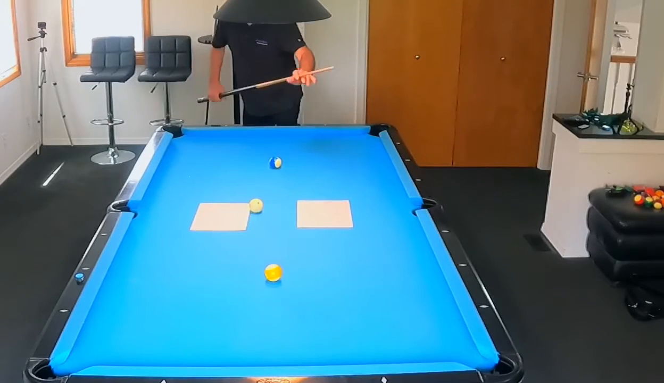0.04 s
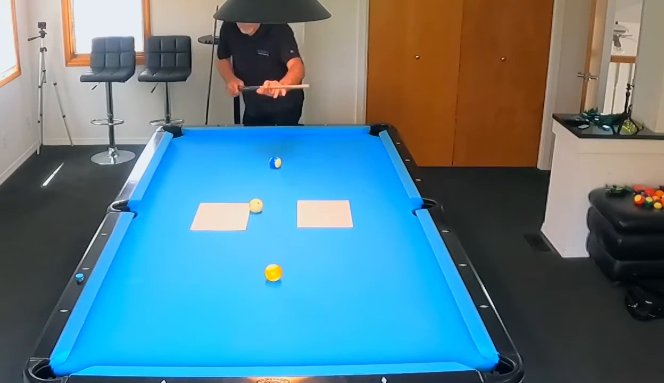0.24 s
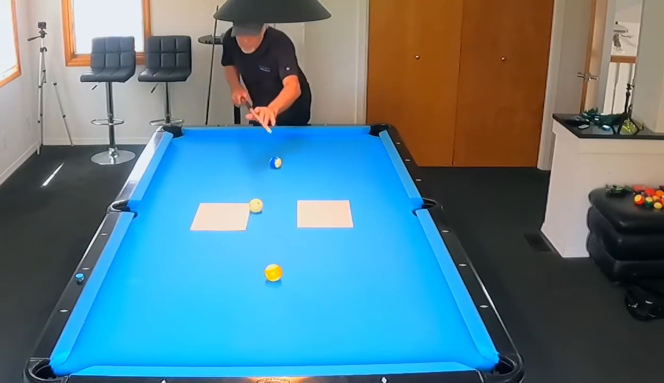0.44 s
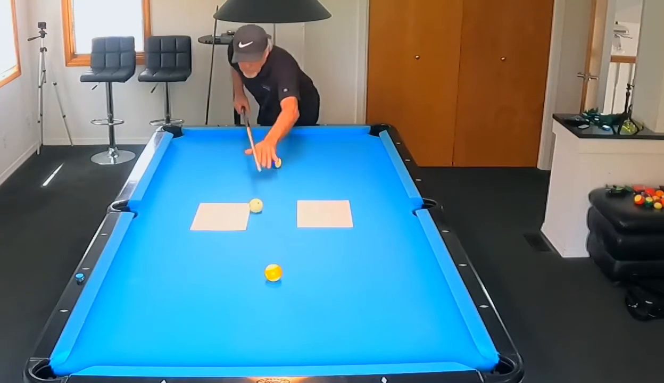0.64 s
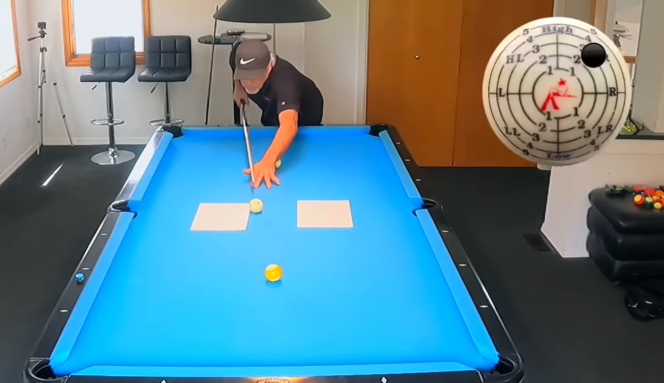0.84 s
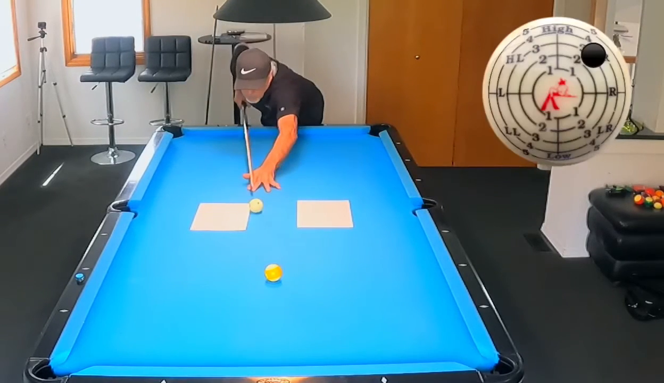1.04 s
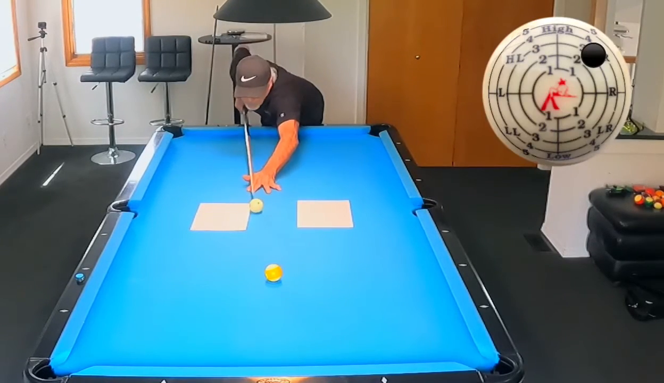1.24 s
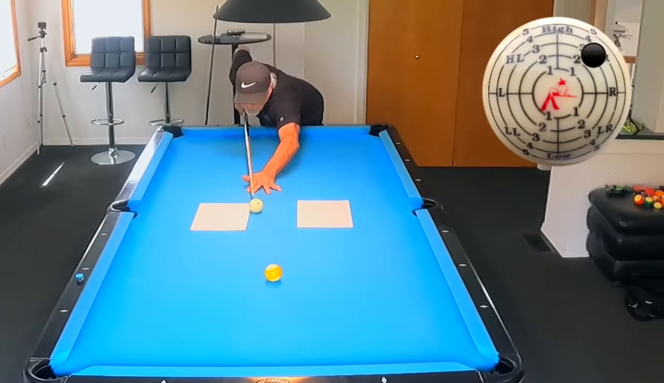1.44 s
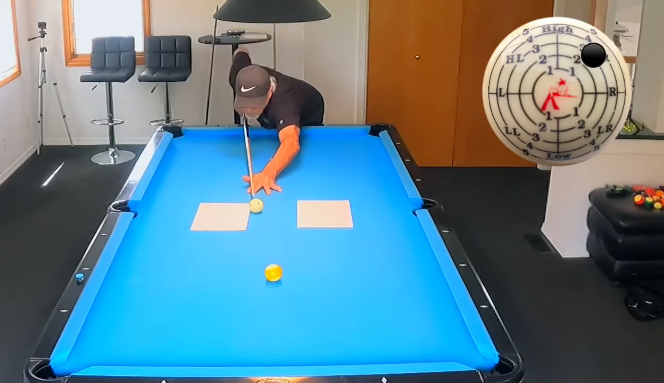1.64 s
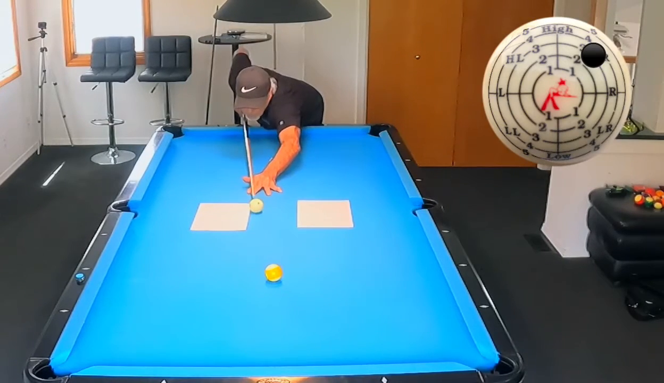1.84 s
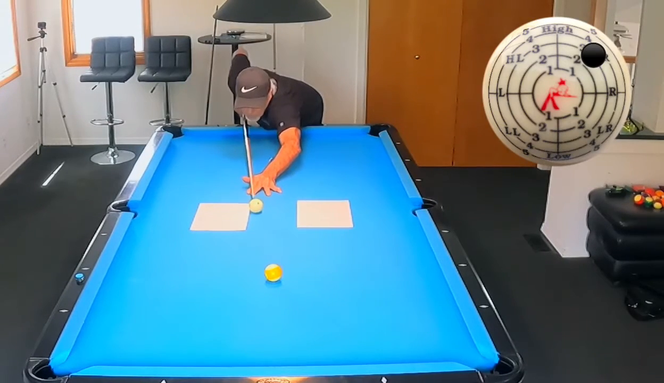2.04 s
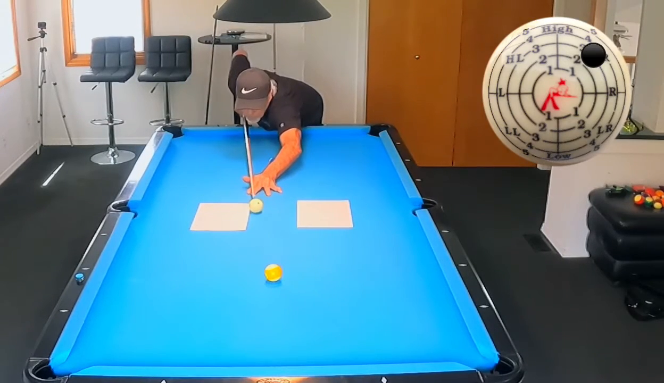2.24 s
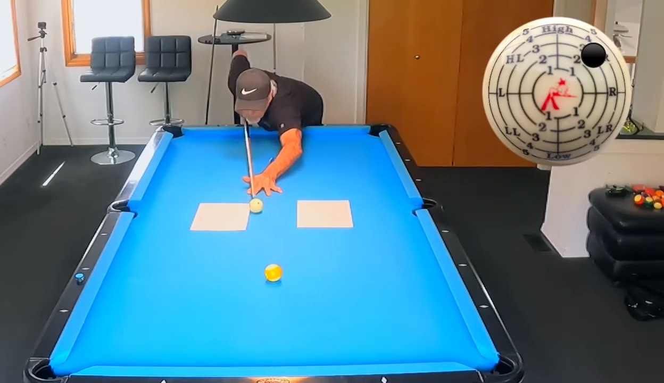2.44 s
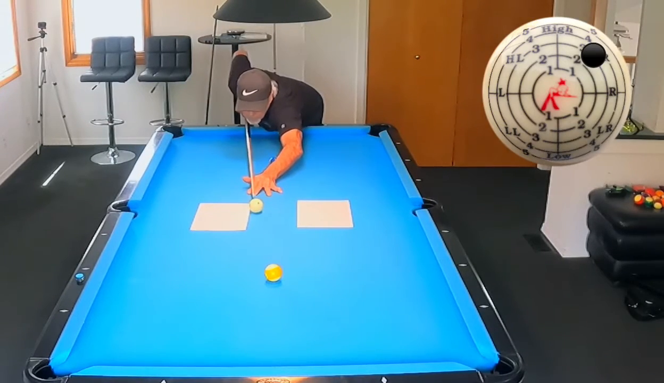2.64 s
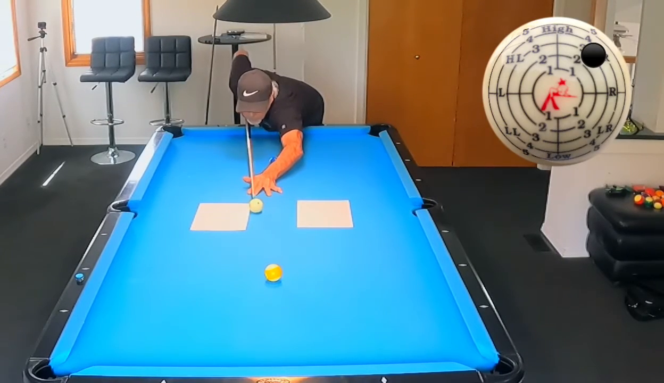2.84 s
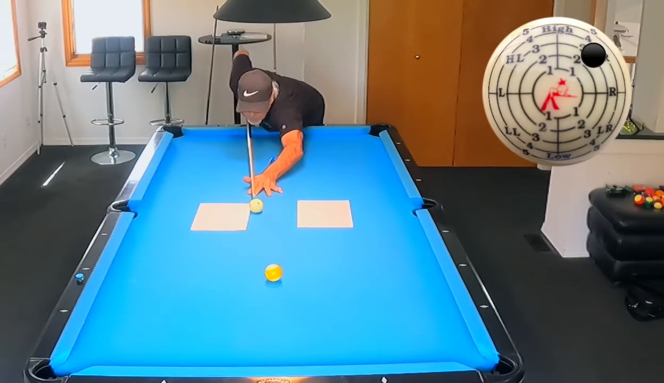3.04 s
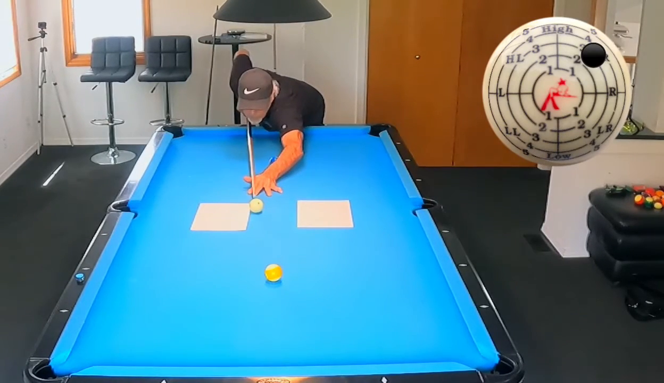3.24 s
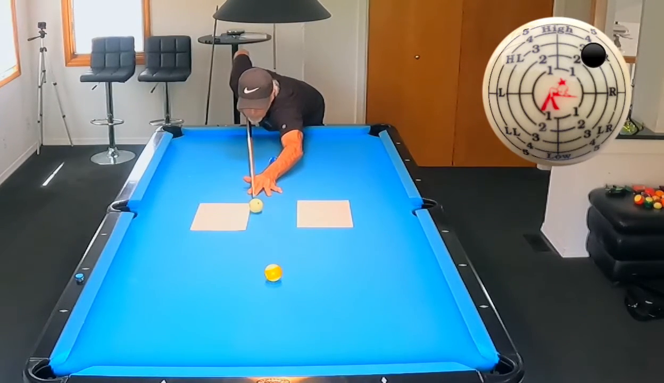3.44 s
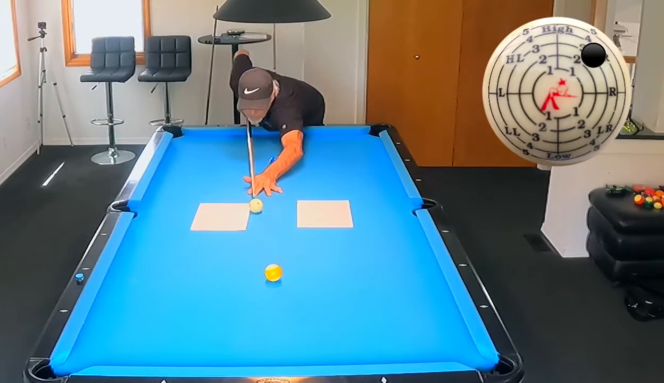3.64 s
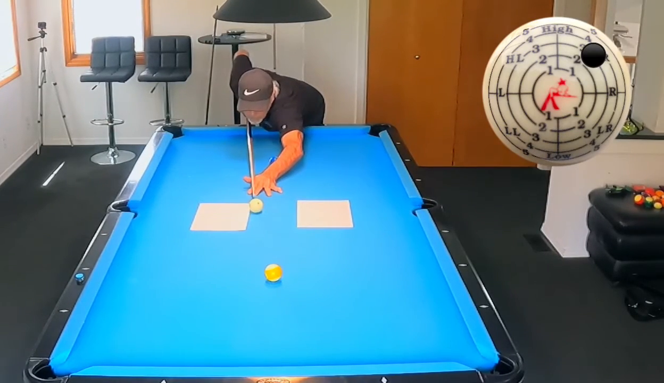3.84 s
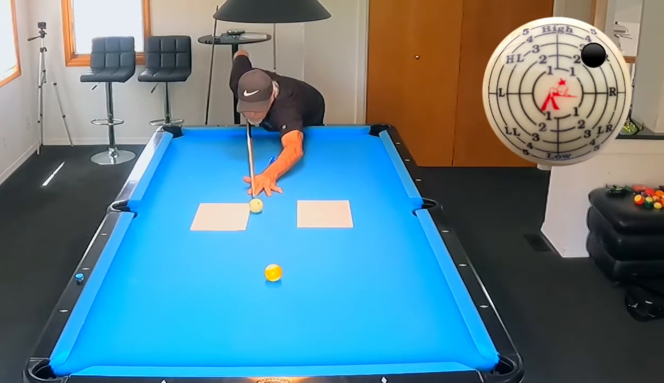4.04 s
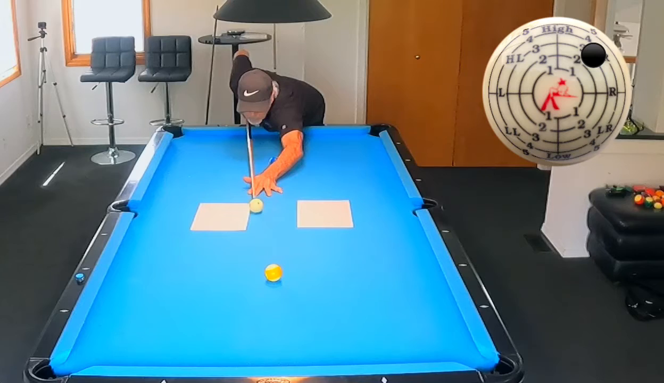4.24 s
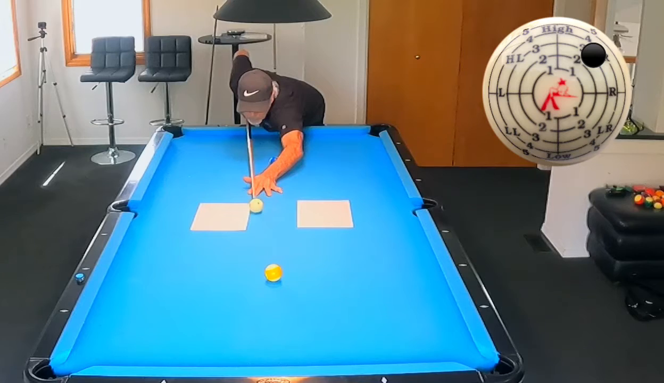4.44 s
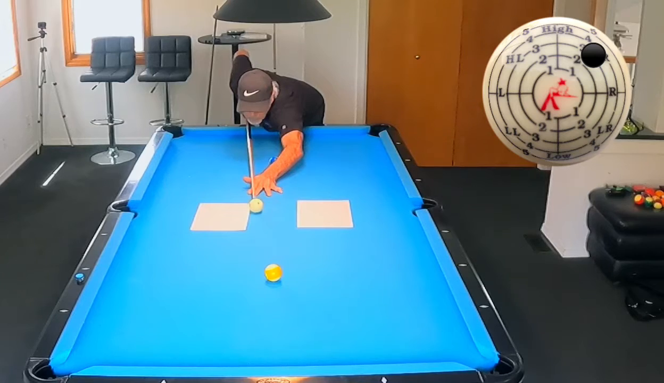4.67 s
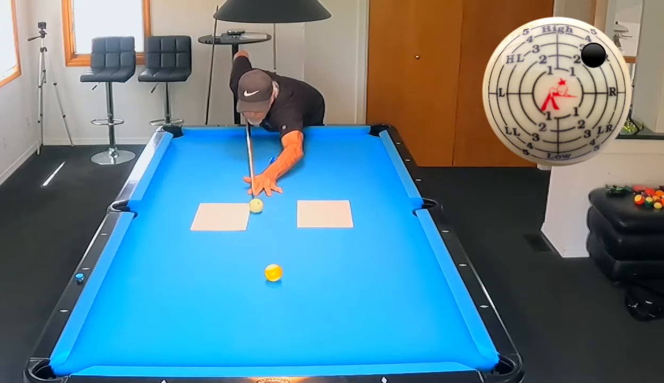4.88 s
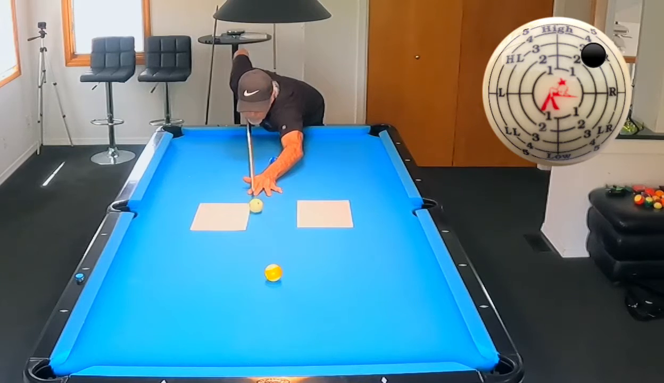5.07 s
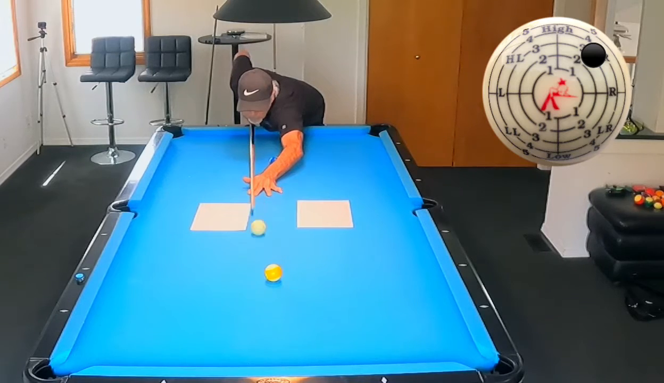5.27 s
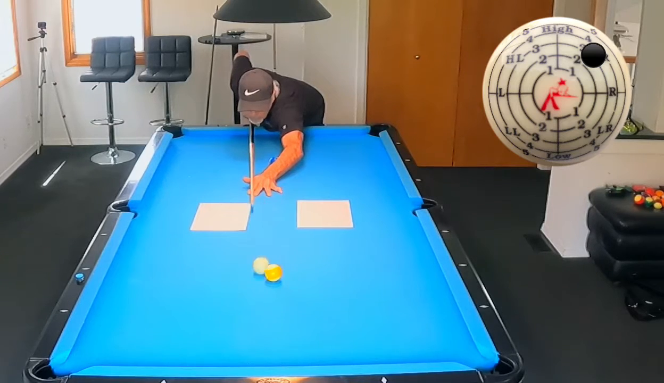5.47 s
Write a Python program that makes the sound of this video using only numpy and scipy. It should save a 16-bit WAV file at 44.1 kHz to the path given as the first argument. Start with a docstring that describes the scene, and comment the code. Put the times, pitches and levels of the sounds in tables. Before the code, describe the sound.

A steady low ventilation rumble with a wavering motor hum and barely audible thin whine runs throughout a quiet, moderately live games room, heard in stereo from the foot of a pool table. From 0 to 1 s, a player settles: soft muffled weight shifts, brushing cloth and, near 0.4 s, a very low footstep thud. A longer fabric sweep swells around 1 s, and a light rub comes at 1.5 s. At 2.0 s a hard, hollow wooden knock slaps out with a dull rebound and short room echo; the rustling then stops. From 2.5 to 5 s only faint shaft-on-hand rubs and small shifts appear, notably at 3.5, 3.8 and 4.5 s. At 5.23 s the tip strikes the ball: a loud dry tock with woody ringing and reverb. At 5.27 s the table bed booms deeply, and the ball rumbles and skids softly to the end.

```python
"""In a quiet, humming games room clothes rustle as a pool player settles, and the cue slides over the bridge hand.
A hard knock rings out; later the tip strikes the ball with a loud tock, the table booms and the ball skids on.
Blows are damped sine modes with short noise bursts and a noise reverb that dies band by band.
Cloth, hand, ball and ventilation are coloured stereo noise under gain curves; the hum is wavering sines."""
import sys
import numpy as np
from scipy import signal
from scipy.fft import rfft, irfft, next_fast_len
from scipy.io import wavfile
from scipy.ndimage import map_coordinates

SR = 44100
rng = np.random.default_rng(int(sys.argv[2]) if len(sys.argv) > 2 else 0)


def to_wav(sig):
    """Store sig (one row per channel, or 1-D mono) as 16-bit WAV at the path in sys.argv[1].

    Samples outside -1..1 are clipped; the rate is SR.
    """
    pcm = np.clip(np.atleast_2d(sig), -1, 1) * 32767
    pcm = np.round(pcm).astype(np.int16)
    wavfile.write(sys.argv[1], SR, pcm.T)  # frames by channels


N = 242991
T = np.arange(N) / SR  # s

# rubbed cloth, relative spectrum: (frequency [Hz], density [dB per Hz])
FABRIC_SPECTRUM = [(300, -1), (700, -6.5), (1200, 2.5), (1700, -2.5), (2600, -6.5), (4000, -7.5),
                   (5600, -5.5), (7500, -10.5), (9500, -18.5), (13000, -26)]


def amp(db):
    """Decibels to gain."""
    return 10 ** (np.asarray(db) / 20)


def unit(x):
    """Scale to rms 1."""
    return x / np.sqrt(np.mean(x ** 2) + 1e-20)


def along(points, hz):
    """Interpolate (Hz, value) points on a log frequency axis."""
    point_hz, value = np.transpose(points)
    return np.interp(np.log(hz + 1), np.log(point_hz), value)


def filtered(x, response):
    """Multiply the spectrum of x by a response of frequency [Hz]."""
    size = next_fast_len(x.shape[-1] + 8192)
    spectrum = rfft(x, size) * response(np.fft.rfftfreq(size, 1 / SR))
    return irfft(spectrum, size)[..., :x.shape[-1]]


def wobble(knots_per_s):
    """Smooth random curve through normally distributed knots."""
    knots = rng.standard_normal(int(N * knots_per_s / SR) + 4)
    return map_coordinates(knots, [T * knots_per_s])


def placed(x, start_s, left_db):
    """Start a stereo sound at start_s, the left channel raised by left_db relative to the right."""
    late = np.pad(x, ((0, 0), (round(start_s * SR), N)))[:, :N]
    return late * amp([[left_db / 2], [-left_db / 2]])


def at_mics(x):
    """Sound reaches the two microphones slightly out of phase."""
    # phase by which left leads right: (frequency [Hz], lead [rad])
    lead_points = [(100, -0.0092), (300, -0.48), (700, -0.9), (1500, -0.74), (3000, -0.83), (6000, 0)]
    side_sign = np.array([[1], [-1]])
    return filtered(x, lambda hz: np.exp(.5j * along(lead_points, hz) * side_sign))


def diffuse(spectrum, size=N):
    """Coloured stereo noise of rms 1: alike in both ears in the bass, less so in the treble."""
    # correlation between the microphones: (frequency [Hz], likeness [0..1])
    likeness = [(60, 0.98), (130, 0.94), (280, 0.84), (600, 0.76), (1400, 0.57), (3000, 0.63), (8000, 0.48)]

    def mid_side_gain(hz):
        """Split the colour into mid and side to give the wanted correlation."""
        angle = np.arccos(np.clip(along(likeness, hz), 0, 1)) / 2
        return amp(along(spectrum, hz)) * [np.cos(angle), np.sin(angle)]

    mid, side = filtered(rng.standard_normal((2, size)), mid_side_gain)
    return unit(at_mics(np.array([mid + side, mid - side])))


def ring(modes, rise_s):
    """One second of damped modes (Hz, dB, t60 s), alternating in sign, under an exponential rise."""
    t = T[:SR]
    tones = 0
    for k, (hz, db, t60_s) in enumerate(modes):
        tones = tones + (-1) ** k * amp(db - 60 * t / t60_s) * np.sin(2 * np.pi * hz * t)
    return at_mics(tones * (1 - np.exp(-t / rise_s)))


def crack(spectrum, t60_s):
    """Direct sound of a contact: a decaying noise burst."""
    return diffuse(spectrum, size=SR) * amp(-60 * T[:SR] / t60_s)


def reverb(spectrum, gap_s, rise_s, early_db, early_t60_s):
    """The room's answer to a blow: after a gap, early energy on top of a tail dying band by band."""
    # room decay: (frequency [Hz], t60 [s])
    wall_decay = [(100, 0.98), (260, 0.79), (700, 0.63), (1200, 0.74), (2000, 0.58), (4000, 0.52),
                  (7000, 0.45), (12000, 0.32)]
    hz, t, bands = signal.stft(diffuse(spectrum, size=SR), SR, nperseg=512)
    decay = amp(-60 * t / along(wall_decay, hz)[:, None])
    tail = signal.istft(bands * decay, SR, nperseg=512)[1][:, :SR]
    age_s = np.maximum(T[:SR] - gap_s, 0)
    early = 1 + amp(early_db - 60 * age_s / early_t60_s)
    return tail * (1 - np.exp(-age_s / rise_s)) * early


def swells(rows, rise_ratio=0.53):
    """Gain of (peak s, fall s, peak dB) swells: Gaussian, the rise rise_ratio times as long as the fall."""
    gain = 0
    for peak_s, fall_s, db in rows:
        width_s = fall_s * np.where(T < peak_s, rise_ratio, 1)
        gain = gain + amp(db) * np.exp(-2 * ((T - peak_s) / width_s) ** 2)
    return gain


def resonant(spectrum, peaks):
    """Add a body's resonances (Hz, width Hz, dB) in power to a smooth spectrum."""
    hz = np.geomspace(20, SR / 2, 2000)
    power = amp(along(spectrum, hz)) ** 2
    for peak_hz, width_hz, db in peaks:
        power = power + amp(db) ** 2 / (1 + ((hz - peak_hz) / width_hz * np.sqrt(2)) ** 2) ** 2
    return np.transpose([hz, 10 * np.log10(power)])


def shot(click_db=-29, ring_db=6, room_db=-21.5):
    """The leather tip hits the ball: a dry tock, then the resonances of cue and table fill the room."""
    # dry tock: (frequency [Hz], level [dB], t60 [s])
    tock_modes = [(167, -18.5, 0.075), (420, -13.5, 0.027), (1077, -13, 0.017), (2190, -30, 0.013)]
    # ring of cue and table: (frequency [Hz], level before ring_db [dB], t60 [s])
    wood_modes = [(231.4, -33.5, .35), (392, -42, 0.51), (466, -42, 0.56), (528, -36.5, 0.61),
                  (594, -41, 0.57), (757, -41, 0.77), (908, -38.5, 0.81), (1057, -41, 0.68),
                  (1082, -42, 0.64), (1471, -33, 0.44), (1487, -36, 0.27), (1506, -41, 0.4),
                  (2380, -41.5, 0.43), (2680, -48.5, 0.53), (3074, -56, .5)]
    # spread of the blow, relative spectrum: (frequency [Hz], density [dB per Hz])
    blow_spectrum = [(40, -20.5), (100, -23), (170, -7), (330, -10), (600, -12.5), (1000, -12), (1600, -22),
                     (2800, -22.5), (4500, -29), (7000, -37.5), (9500, -49.5), (13000, -62)]
    # broad resonances of cue and table: (frequency [Hz], width [Hz], relative level [dB])
    cue_peaks = [(233, 58, -1), (405, 63, -7.5), (530, 120, -7), (720, 110, -8), (923, 90, -5),
                 (1050, 110, -5), (1220, 60, -13), (1470, 52, -1.5), (1770, 95, -13), (2070, 140, -12.5),
                 (2367, 75, -8), (2690, 81, -13.5), (3050, 110, -13.5), (3500, 220, -22),
                 (3870, 270, -24.5)]
    click_spectrum = [(300, 0), (1200, 13), (2500, -2), (4500, -14), (13000, -28)]  # (Hz, dB per Hz)

    click = amp(click_db) * crack(click_spectrum, t60_s=0.034)
    direct = ring(tock_modes, rise_s=0.00051) + click
    wood = amp(ring_db) * ring(wood_modes, rise_s=.016)
    blow = resonant(blow_spectrum, cue_peaks)
    walls = amp(room_db) * reverb(blow, gap_s=0.0025, rise_s=0.0057, early_db=-13.5, early_t60_s=0.23)
    tock = placed(direct, 5.2305, left_db=0.0)
    return tock + placed(wood, 5.2312, left_db=2.0) + placed(walls, 5.2312, left_db=1.5)


def ball(boom_db=0, thud_db=-30, rumble_db=-43, skid_db=-65, start_s=5.27, grip_s=0.042):
    """The hopping ball lands on the bed, which booms, and skids on over the cloth as steady noise."""
    # table bed; the close pair beats: (frequency [Hz], level [dB], t60 [s])
    bed_modes = [(39, -31, 0.86), (104.26, -20, 0.95), (107.26, -19, 0.98), (122.6, -33, .6),
                 (232.7, -28.5, 0.58), (268.5, -31, 0.76), (292.3, -37, .7)]
    slate = [(25, -19), (60, -10), (130, -1.5), (280, -6.0), (450, -15.5), (1000, -15.0),
             (2000, -38), (6000, -72)]  # (Hz, dB per Hz)

    thud = amp(thud_db) * reverb(slate, gap_s=0.0029, rise_s=0.0054, early_db=-0.5, early_t60_s=0.44)
    boom = amp(boom_db) * ring(bed_modes, rise_s=0.006)
    landing = placed(boom + thud, 5.272, left_db=0.2)
    rolling = np.clip((T - start_s) / grip_s, 0, 1)
    rumble = amp(rumble_db) * diffuse(slate)
    skid = amp(skid_db) * diffuse(FABRIC_SPECTRUM)
    return landing + rolling * (rumble + skid)


def knock(slap_db=-35.5, room_db=-36, hollow_db=-33):
    """A hard knock: hollow wooden thump with a dull rebound, a slap, and their answer from the walls."""
    # thump and rebound: (time [s], thump gain [dB])
    bumps = [(2.009, 1.5), (2.07, -3.5)]
    # thump: (frequency [Hz], level before bump gain [dB], t60 [s])
    thump_modes = [(124.8, -25, 0.33), (146.5, -30.5, 0.21), (202, -35.5, 0.16), (251, -40, 0.19)]
    # slap, relative spectrum: (frequency [Hz], density [dB per Hz])
    slap_spectrum = [(300, -12), (520, -13.5), (850, -5.5), (1400, -2.5), (2100, -6.5), (3000, -8.5),
                     (4600, -12.5), (5800, -16), (7400, -21), (9500, -33), (13000, -43)]
    # knocked wood: (frequency [Hz], width [Hz], relative level [dB])
    panel_peaks = [(910, 130, -2.5), (1120, 130, -0.5), (1730, 98, -5), (2500, 450, -7.5), (3330, 200, -9),
                   (3920, 160, -8), (4620, 160, -11), (5250, 160, -14)]
    hollow_spectrum = [(60, -17), (130, 0.0), (200, -1), (300, -7.5),
                       (450, -23.5), (1000, -50)]  # (Hz, dB per Hz)

    thump = sum(placed(amp(db) * ring(thump_modes, rise_s=0.0024), s, left_db=0) for s, db in bumps)
    colour = resonant(slap_spectrum, panel_peaks)
    slap = amp(slap_db) * crack(colour, t60_s=0.16) * (1 - np.exp(-T[:SR] / 0.0021))
    walls = amp(room_db) * reverb(colour, gap_s=.013, rise_s=0.0029, early_db=0, early_t60_s=0.37)
    hollow = amp(hollow_db) * reverb(hollow_spectrum, gap_s=.004, rise_s=0.0071,
                                     early_db=-15, early_t60_s=0.091)
    return thump + placed(slap + walls + hollow, 2.0085, left_db=1.5)


def player(catch_db=2.5):
    """Uneven noise swells: shaft over bridge hand, shifts of weight, a faint brief one just before the tock."""
    # shaft over bridge hand; the last row is only a faint brief noise swell just before the tock:
    # (peak time [s], fall length [s], rub level [dB], hiss level [dB])
    noise_swells = [(1.5, 0.12, -62.5, -68), (2.51, 0.14, -67.5, -70.5), (2.85, .1, -70.5, -76),
                    (3.498, 0.12, -63.5, -71.5), (3.847, 0.094, -69.5, -68), (4.488, 0.12, -68, -75),
                    (5.225, .025, -56.5, -74.5)]
    # rub, relative spectrum: (frequency [Hz], density [dB per Hz])
    rub_spectrum = [(300, -15), (800, -17), (1200, 5.5), (1600, 2.5), (2200, 0.5), (2900, -12), (5000, -27),
                    (13000, -45)]
    # hiss, relative spectrum: (frequency [Hz], density [dB per Hz])
    hiss_spectrum = [(1500, -17), (3000, -5), (4400, 0.5), (5800, 2), (7500, -8), (9500, -14.5),
                     (13000, -26)]
    # soft weight shifts: (peak time [s], fall length [s], level [dB])
    shifts = [(.055, 0.095, -45.5), (.18, 0.095, -48.5), (.355, 0.079, -47.5), (.685, .05, -52.5),
              (.76, 0.12, -51), (1.64, 0.17, -58), (3.83, 0.092, -55), (4.42, 0.11, -57), (5.01, .09, -57)]
    # body movement, relative spectrum: (frequency [Hz], density [dB per Hz])
    body_spectrum = [(60, -21), (130, -0.5), (200, 2), (320, -3), (450, -3), (600, -6), (850, -18),
                     (2000, -27.5), (6000, -48)]

    rub = swells([(s, fall_s, db) for s, fall_s, db, _ in noise_swells]) * diffuse(rub_spectrum)
    hiss = swells([(s, fall_s, db) for s, fall_s, _, db in noise_swells]) * diffuse(hiss_spectrum)
    body = swells(shifts) * diffuse(body_spectrum)
    return amp(catch_db * wobble(55)) * (rub + hiss + body)


def clothes(grain_db=0.83, bright_hz=9500, rise_ratio=0.67):
    """Fabric rustles ever more softly until the stance is set; quick sweeps swell above it, brighter."""
    # sleeve and hand over the cloth: (peak time [s], fall length [s], level [dB])
    sweeps = [(.185, 0.098, -60), (.385, .1, -61), (.68, 0.14, -65.5), (.96, 0.25, -58.5), (1.85, .09, -66)]
    rustle_db, calm_db_per_s, still_s, settle_s = -61.5, -1.5, 2.08, .15

    moving = np.clip((still_s + settle_s - T) / settle_s, 0, 1)
    rustle = moving * amp(rustle_db + calm_db_per_s * T) * diffuse(FABRIC_SPECTRUM)
    swish = unit(filtered(diffuse(FABRIC_SPECTRUM), lambda hz: 1 + (hz / bright_hz) ** 2))
    return amp(grain_db * wobble(70)) * (rustle + swells(sweeps, rise_ratio) * swish)


def footstep(floor_db=-35):
    """One step on the carpet sets the floor swaying in two low damped modes."""
    floor_modes = [(28.8, 0.5, .7), (43.8, -1.5, .5)]  # (Hz, dB re floor_db, t60 s)
    return placed(amp(floor_db) * ring(floor_modes, rise_s=.012), 0.39, left_db=1.5)


def ventilation(air_db=-46, hum_db=0, waver_db=1.5, drift_rad=0.62, surge_db=2.0):
    """A rush of air surging in the bass, with a motor's wavering hum and a thin whine."""
    # air, relative spectrum: (frequency [Hz], density [dB per Hz])
    air_spectrum = [(20, -20.5), (33, -8.5), (48, -11), (64, -8.5), (86, -17), (118, -13), (170, -18.5),
                    (290, -23.5), (370, -31), (500, -38), (800, -45.5), (1300, -39.5), (2000, -51),
                    (3200, -58.5), (5800, -55.5), (7600, -58.5), (9500, -70), (13000, -79)]
    # steady tones: (frequency [Hz], nominal rms level [dB])
    motor_tones = [(59.2, -45.5), (113.0, -52.5), (1200, -83.5), (5760, -84.5)]

    tones = 0
    for hz, db in motor_tones:
        level = amp(db + waver_db * wobble(3.965))
        tones = tones + level * np.sin(2 * np.pi * hz * T + drift_rad * wobble(9.5))
    air = diffuse(air_spectrum)
    rumble = filtered(air, lambda hz: 1 / (1 + (hz / 200) ** 2))
    surging = air + rumble * (amp(surge_db * wobble(14)) - 1)
    return amp(air_db) * surging + amp(hum_db) * np.sqrt(2) * tones  # sqrt(2): rms to peak


def scene():
    """Everything heard from the foot of the table."""
    return shot() + ball() + knock() + player() + clothes() + footstep() + ventilation()


def record(dry, top_hz=13700):
    """Steep low-pass: almost nothing passes above top_hz."""
    return filtered(dry, lambda hz: 1 / (1 + (hz / top_hz) ** 80))


dry = scene()
out = record(dry)
to_wav(out)
```